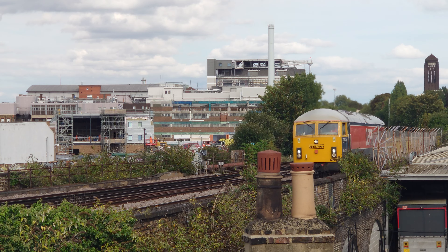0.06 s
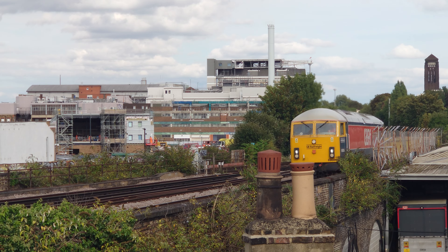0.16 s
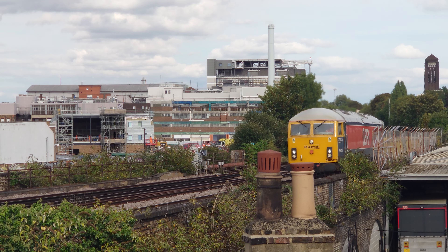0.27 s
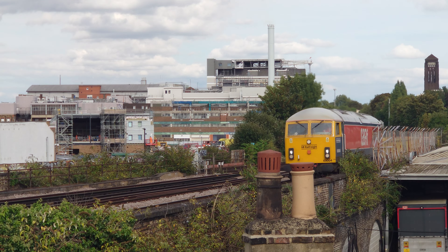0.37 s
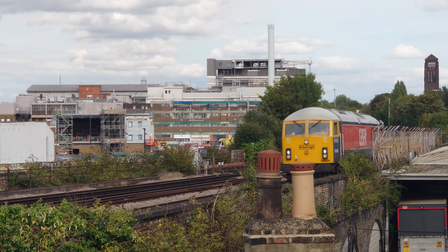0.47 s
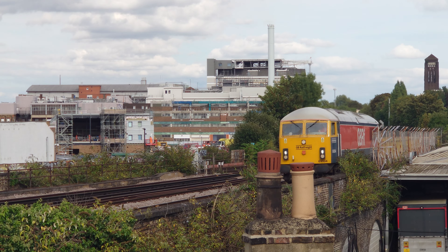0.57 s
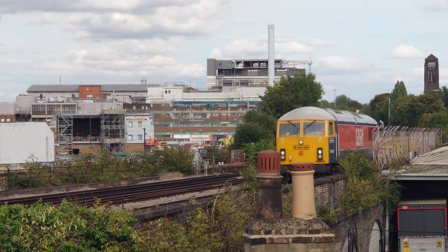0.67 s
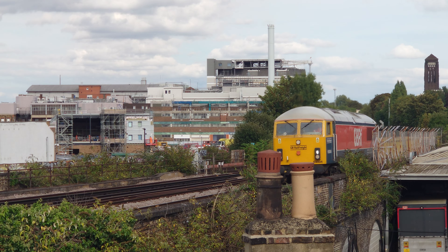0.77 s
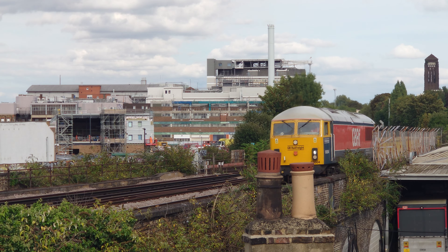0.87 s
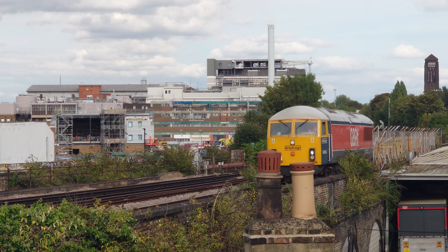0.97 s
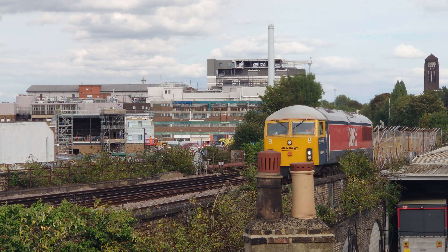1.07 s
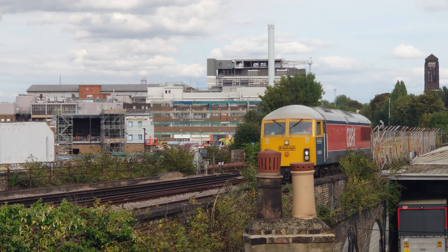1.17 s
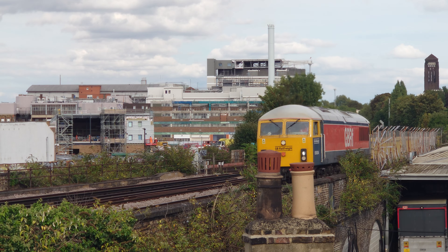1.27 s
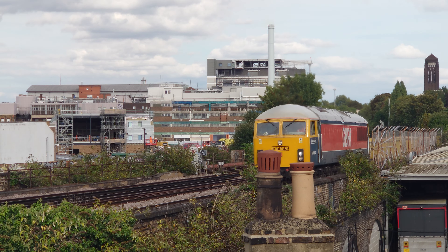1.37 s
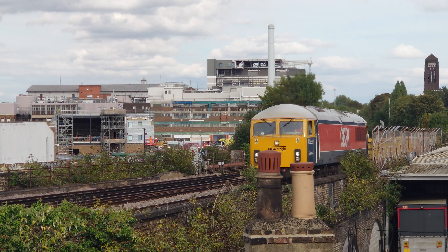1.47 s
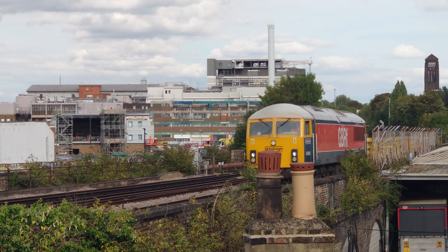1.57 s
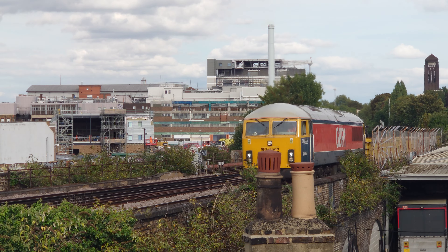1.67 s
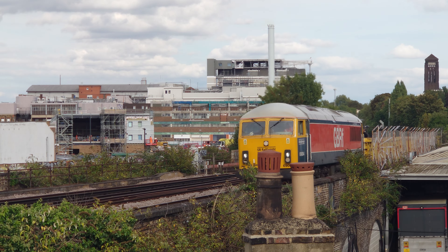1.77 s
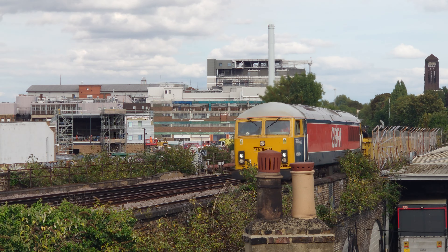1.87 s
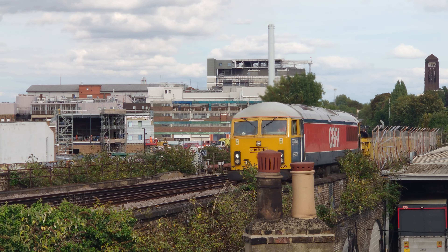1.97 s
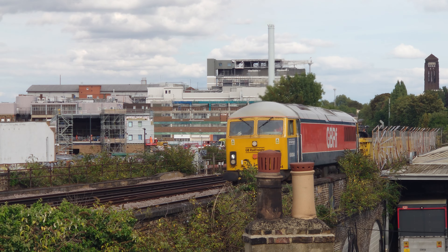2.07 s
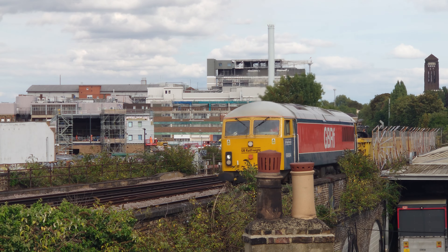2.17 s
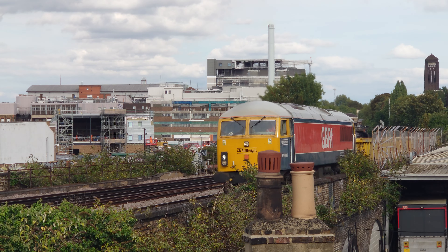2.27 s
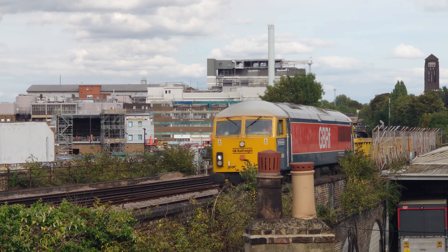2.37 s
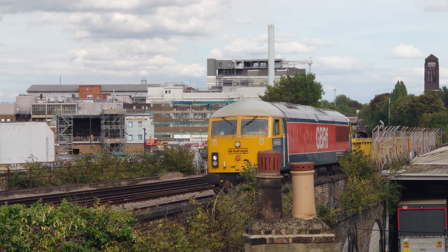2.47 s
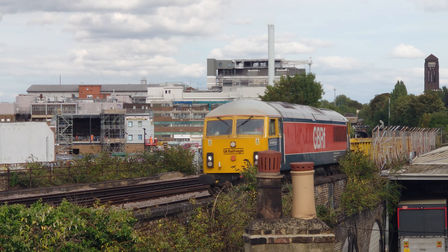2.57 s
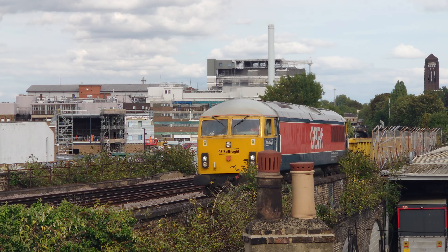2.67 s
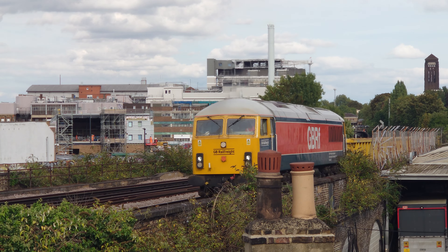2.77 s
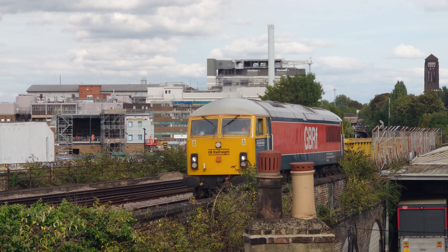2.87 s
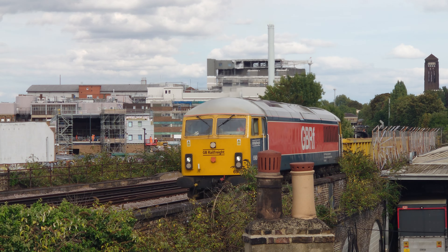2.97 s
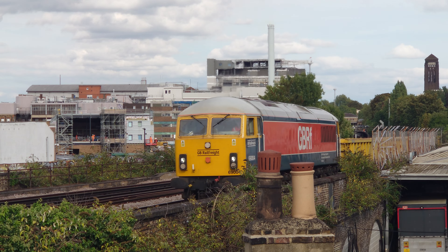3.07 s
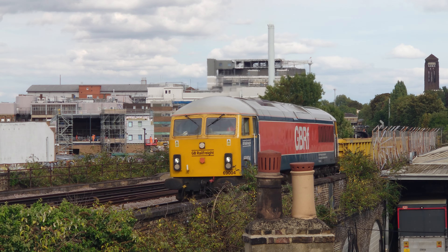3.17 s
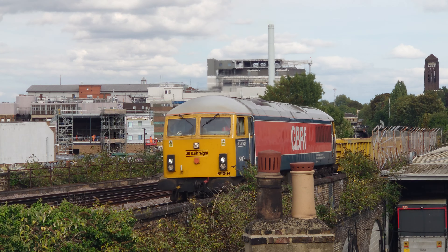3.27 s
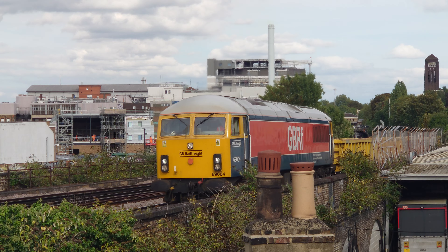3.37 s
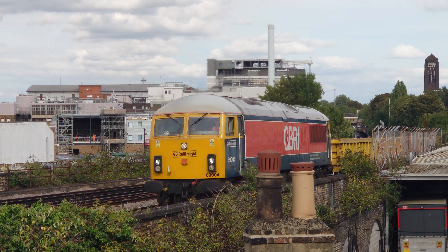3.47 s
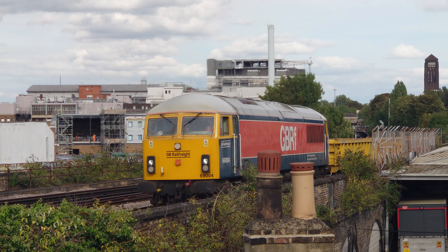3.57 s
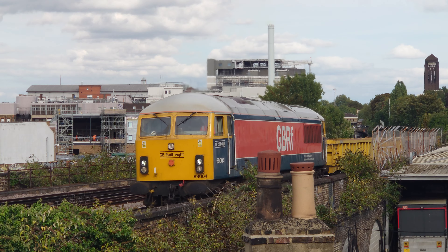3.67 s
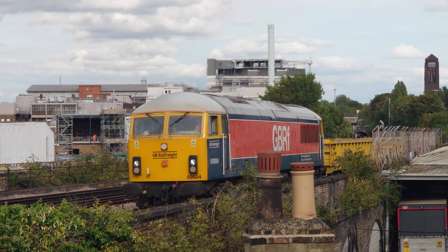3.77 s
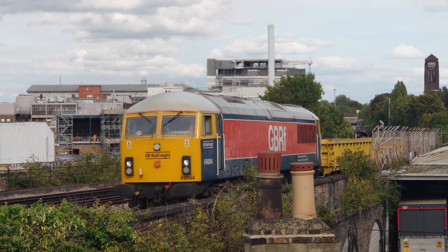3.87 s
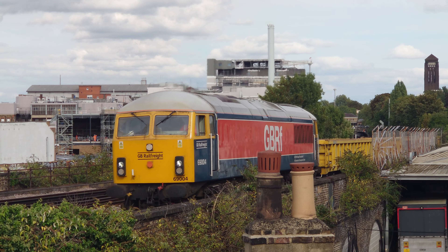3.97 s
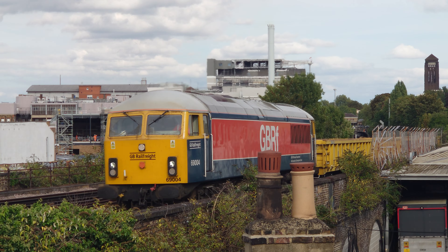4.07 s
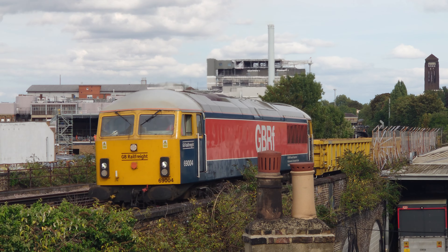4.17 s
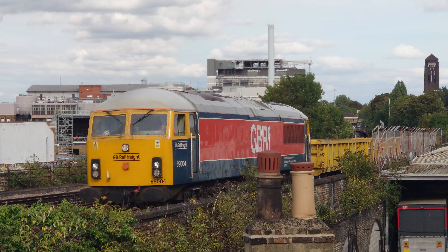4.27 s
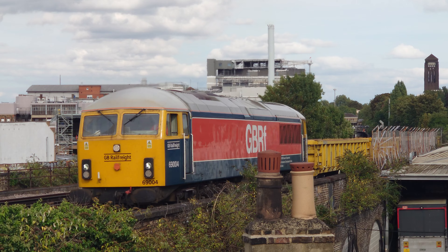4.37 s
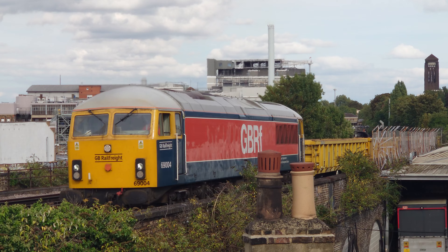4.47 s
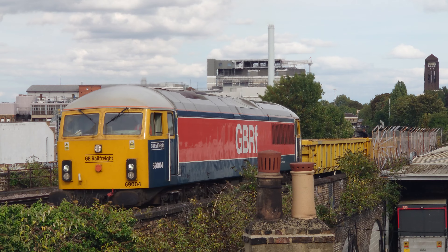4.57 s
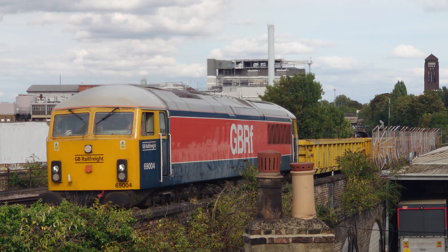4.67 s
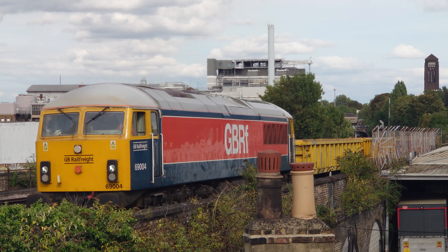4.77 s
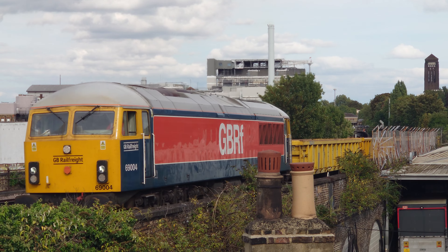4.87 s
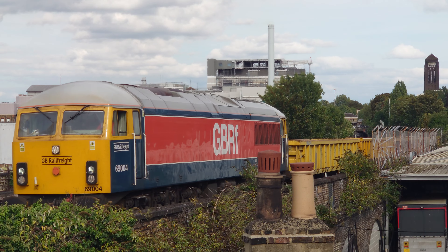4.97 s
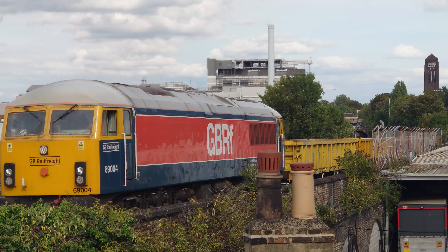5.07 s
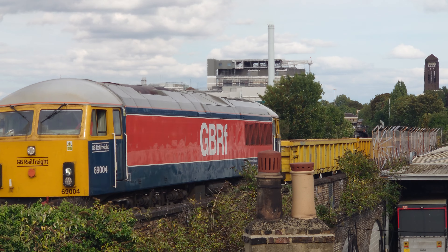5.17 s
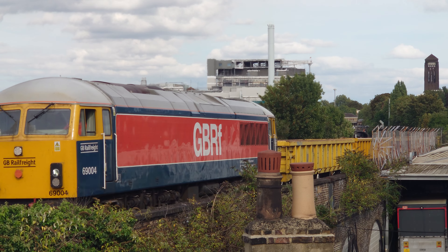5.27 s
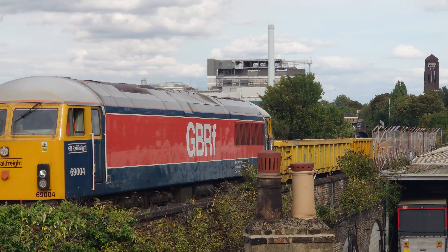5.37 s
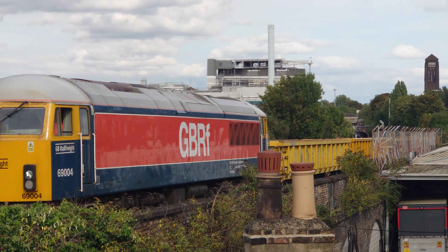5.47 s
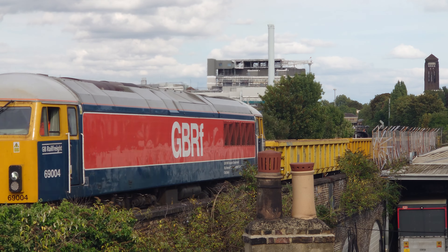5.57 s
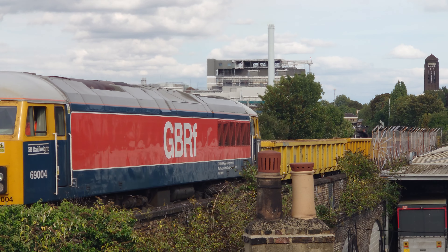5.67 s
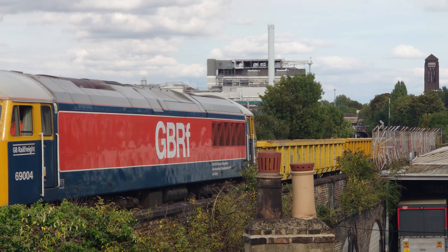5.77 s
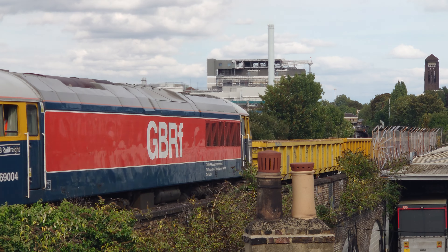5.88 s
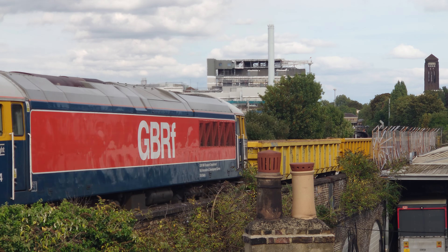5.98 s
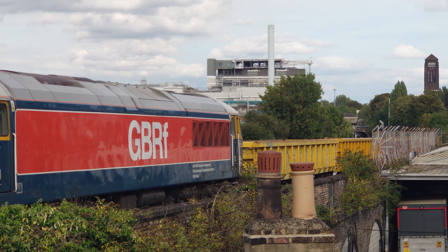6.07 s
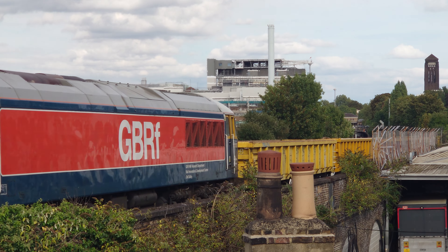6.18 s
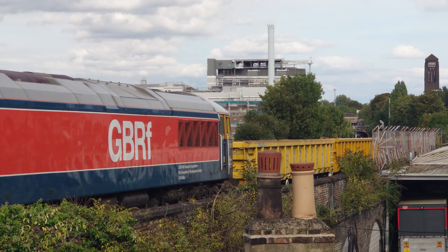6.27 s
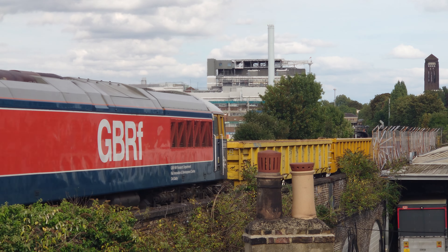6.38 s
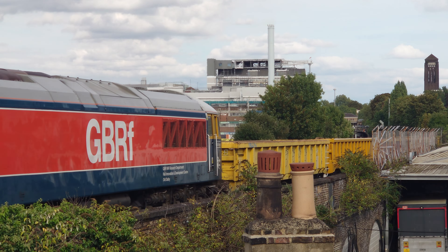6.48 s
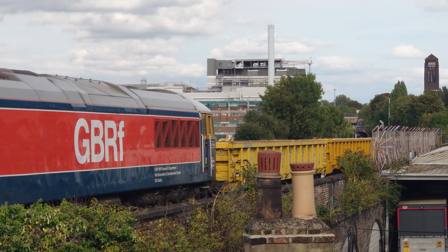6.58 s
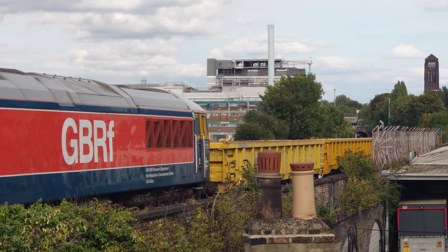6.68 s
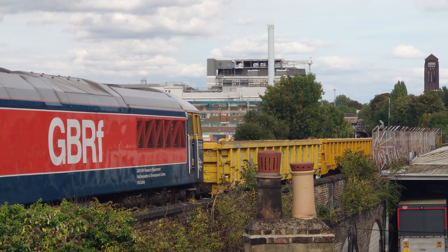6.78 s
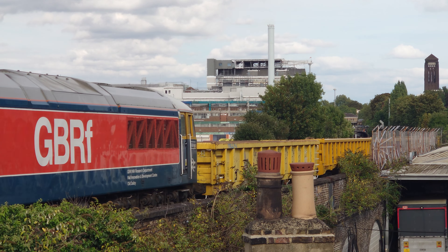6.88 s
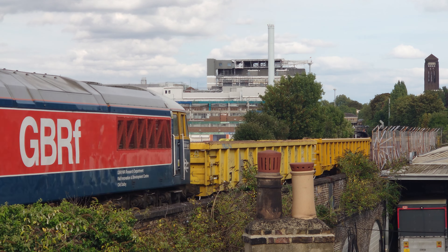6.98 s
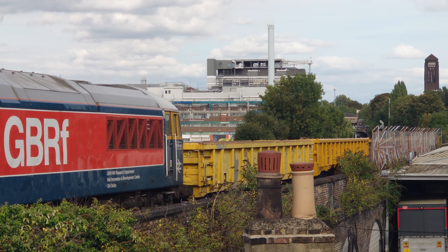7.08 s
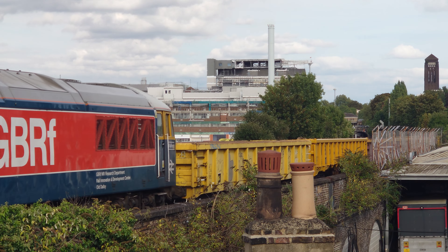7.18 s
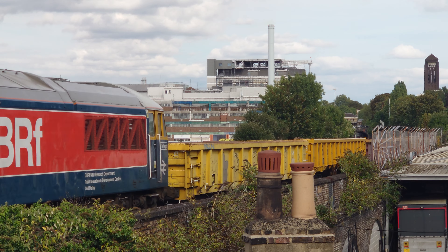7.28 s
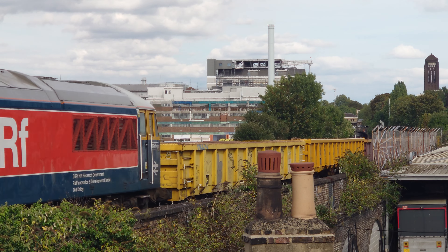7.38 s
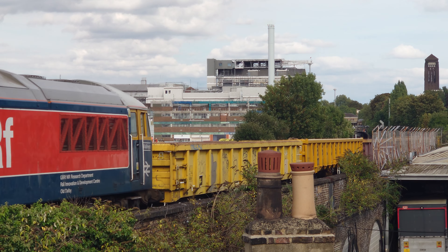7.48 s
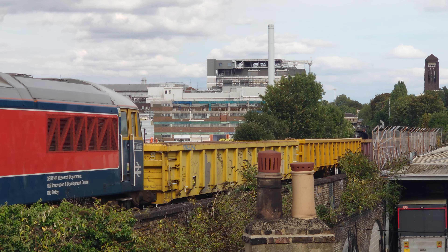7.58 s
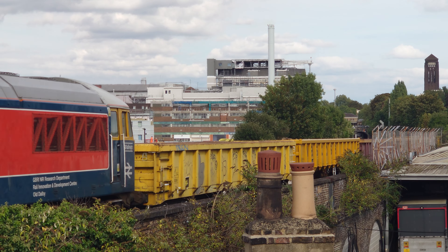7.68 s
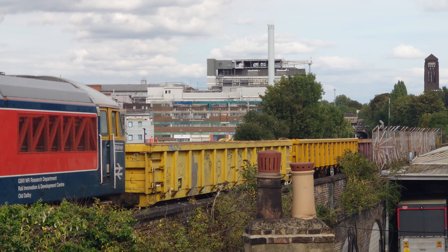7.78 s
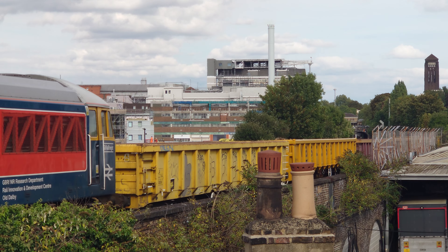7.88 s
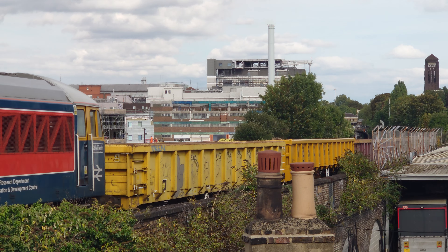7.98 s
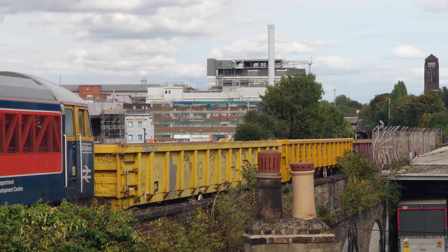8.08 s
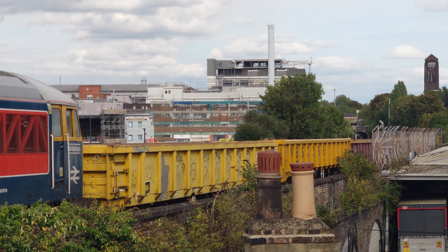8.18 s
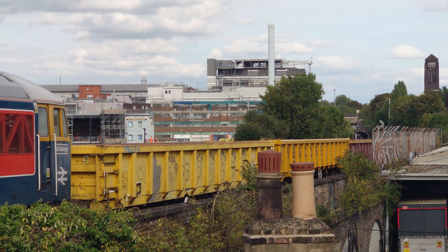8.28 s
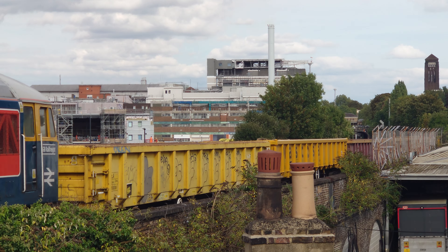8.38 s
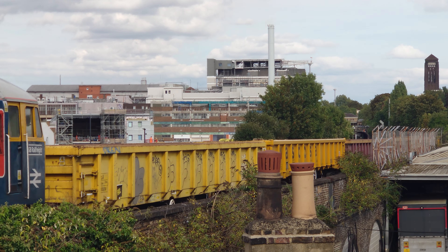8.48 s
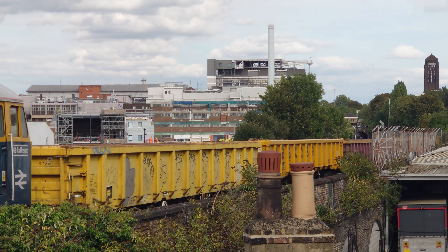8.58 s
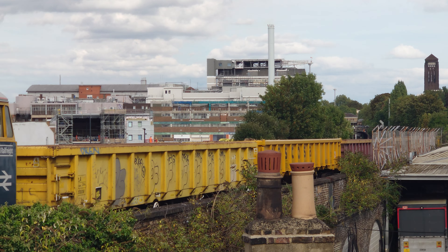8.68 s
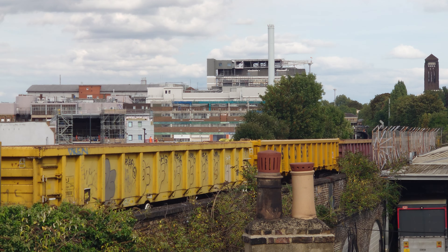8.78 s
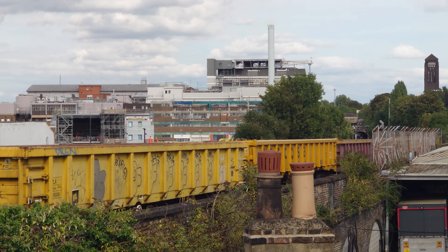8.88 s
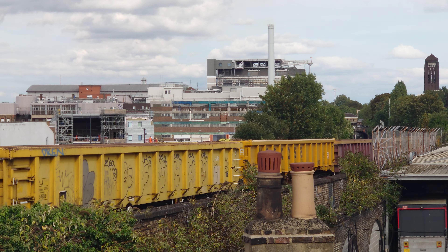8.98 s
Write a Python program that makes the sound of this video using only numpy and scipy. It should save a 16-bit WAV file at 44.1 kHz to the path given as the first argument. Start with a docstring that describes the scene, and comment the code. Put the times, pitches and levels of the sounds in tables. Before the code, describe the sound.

A diesel locomotive pulls a line of wagons along an outdoor embankment toward a fixed stereo microphone. Its pulsing exhaust drone and low rumble grow steadily louder, mixed with the hiss of fans and rolling wheels. Midway, an air valve gives one short puff. As the engine draws level, the roar gets fuller and brighter, a fluttering blower whine stands out, and a thin whistle cuts through at the end.

```python
"""A diesel locomotive pulls hard along an embankment and draws level, its wagons behind it.
The crankshaft sets a comb of exhaust and gear tones, and a blower whines over them. The roar of
engine and wheels swells, opens up and shifts between the two microphones as the engine room
comes near. An air valve spits once, and the blower's thin octave cuts through at the end."""
import sys
import numpy as np
from scipy import signal
from scipy.fft import rfft, irfft, next_fast_len
from scipy.io import wavfile
from scipy.ndimage import uniform_filter1d, minimum_filter1d, map_coordinates

SR = 44100
rng = np.random.default_rng(int(sys.argv[2]) if len(sys.argv) > 2 else 0)


def write(x):
    x = np.atleast_2d(x).T
    wavfile.write(sys.argv[1], SR, np.round(np.clip(x, -1, 1) * 32767).astype(np.int16))


N = 398223
TIME = np.arange(N) / SR


def amp(db):
    """Gain of a level in dB."""
    return 10 ** (np.asarray(db) / 20)


def along(points, hz):
    """Read a breakpoint curve on a log frequency axis."""
    f, values = np.transpose(points)
    return np.interp(np.log(hz + 1), np.log(f + 1), values)


def curves(rows):
    """One envelope for each column after the time."""
    times, *columns = np.transpose(rows)
    return [np.interp(TIME, times, column) for column in columns]


def wobble(rate):
    """Smooth random modulation, rate knots a second."""
    coarse = TIME[::64]
    knots = rng.standard_normal(round(N / SR * rate) + 4)
    return np.interp(TIME, coarse, map_coordinates(knots, [coarse * rate]))


def tone(cycles, level_db, drift):
    """A sine on a running count of cycles; its phase wanders by about drift radians."""
    angle = 2 * np.pi * ((cycles + rng.random()) % 1) + drift * wobble(6)
    return np.sqrt(2) * amp(level_db) * np.sin(angle)


# Exhaust note envelopes: t/s, level/dB
MAIN_NOTE = [(0.0, -37.5), (0.93, -24.5), (1.28, -32.5), (1.58, -23), (1.76, -24), (1.99, -38),
             (2.11, -25.5), (2.84, -24), (3.09, -25), (3.17, -48), (3.32, -20.5), (3.49, -18.5),
             (3.92, -27), (4.12, -19), (5.31, -21.5), (5.53, -14), (5.73, -24), (5.93, -18), (6.77, -15.5),
             (6.99, -24), (7.22, -14), (7.55, -18.5), (7.95, -13.5), (8.47, -25.5), (8.88, -14.5),
             (9.03, -14)]  # surges and drops out
UNDER_NOTE = [(0.0, -50), (1.16, -29), (1.26, -40), (1.68, -22.5), (2.46, -32.5), (2.51, -47),
              (2.81, -27.5), (4.3, -23), (4.45, -30.5), (5.83, -20.5), (6.09, -34.5), (6.92, -23),
              (7.14, -40), (7.27, -18.5), (8.07, -24), (9.03, -27)]  # swells more slowly
UPPER_NOTE = [(0, -40.5), (.55, -36), (1.1, -34), (1.35, -48.5), (1.9, -34), (3.4, -40.5), (4.3, -33.5),
              (5.6, -38), (7.0, -37.5), (7.3, -26), (7.5, -33), (7.75, -23), (7.95, -34), (8.3, -24),
              (9.03, -23.5)]  # hides in the rumble until the exhaust is close

def exhaust_notes(turns):
    """Firing repeats every turn, so the notes stand on whole multiples (orders) of the shaft speed."""
    return sum(tone(order * turns, curves(envelope)[0] + .8 * wobble(12), drift=2.5 / order)
               for order, envelope in ((9, MAIN_NOTE), (7, UNDER_NOTE), (15, UPPER_NOTE)))


# Deep exhaust tones: their shaft orders, then a row for each: far level/dB, near level/dB
BASS_ORDERS = (3, 5)
BASS_LEVELS = [(-39.5, -17.5), (-36, -25)]

def exhaust_bass(turns, near, fade_db=5):
    """The exhaust's low end builds on the approach and dips at random."""
    bass = np.zeros(N)
    for order, (far_db, near_db) in zip(BASS_ORDERS, BASS_LEVELS):
        level_db = far_db + near * (near_db - far_db) - fade_db * np.abs(wobble(3.2))
        bass += tone(order * turns, level_db, drift=1.8 / order)
    return bass


# The engine's weaker tones: their shaft orders, then a row for each, before trims and swell:
# far level/dB, near level/dB
COMB_ORDERS = (4, 6, 8, 10, 12, 14, 16, 17, 18, 24, 30, 34, 45, 47, 57, 59, 65, 72, 73, 77, 80, 90, 113)
COMB_LEVELS = [(-50, -41), (-41, -39), (-33.5, -33), (-40.5, -34.5), (-43, -55.5), (-46, -34),
               (-44.5, -47.5), (-41.5, -47.5), (-39, -45), (-54, -44.5), (-57.5, -42), (-63, -41),
               (-46.5, -51), (-43, -50), (-53.5, -42.5), (-46.5, -49.5), (-49.5, -44), (-55, -48.5),
               (-48, -38.5), (-49.5, -44), (-50, -48), (-54, -39), (-57.5, -45)]

def engine_comb(turns, near, swell_db, trim_db=1, near_trim_db=-7):
    """Firing and gearing lay down a bed of wavering harmonics that rides up with the roar."""
    comb = np.zeros(N)
    for order, (far_db, near_db) in zip(COMB_ORDERS, COMB_LEVELS):
        level_db = far_db + near * (near_db + near_trim_db - far_db) + swell_db + trim_db
        comb += tone(order * turns, level_db + 3 * wobble(4), drift=.95)
    return comb


BLOWER_ORDER = 117.15  # cycles per shaft turn
# Whine partials: offset/Hz, multiple of the blower pitch, gain/dB
WHINE_PARTIALS = [(0, 1, 3.5), (-16, 1, -10), (22, 1, -14)]
# Whine envelope: t/s, level/dB
WHINE_LEVEL = [(0, -53.5), (2.15, -55.5), (2.4, -48), (3.3, -53), (4.4, -40), (4.7, -49), (5.3, -44.5),
               (5.8, -49.5), (6.1, -44.5), (6.5, -39), (6.75, -47), (7.0, -29.5), (7.3, -35), (7.45, -45),
               (7.7, -31), (8.25, -40.5), (8.4, -37), (9.03, -41)]

def blower_whine(turns, flutter_db=1.2):
    """The blower tracks the shaft: one fluttering tone with a sideband on either side."""
    level_db, = curves(WHINE_LEVEL)
    whine = np.zeros(N)
    for offset_hz, multiple, gain_db in WHINE_PARTIALS:
        cycles = multiple * BLOWER_ORDER * turns + offset_hz * TIME
        whine += tone(cycles, level_db + gain_db + flutter_db * wobble(25), drift=.67)
    return whine


# Gear tone envelope: t/s, level/dB
GEAR_LEVEL = [(0, -49), (1.7, -49), (2.7, -43.5), (3.5, -43.5), (4.0, -34.5), (4.3, -44.5), (6.3, -47),
              (7.4, -41), (7.9, -29.5), (9.03, -41)]

def gear_mesh(turns, teeth=79, flutter_db=2.5):
    """Meshing gears sing at one cycle per tooth."""
    return tone(teeth * turns, curves(GEAR_LEVEL)[0] + flutter_db * wobble(24), drift=.7)


# Stereo width of the noise: f/Hz, left-right likeness (0-1)
LIKENESS = [(25, 0.67), (170, 0.98), (350, 0.75), (520, .72), (850, 0.86), (1300, 0.83), (2000, 0.17),
            (3500, 0.11), (5500, 0.21), (15000, .05)]
# Pan by frequency: f/Hz, left minus right/dB
PAN_FAR = [(60, 13.5), (500, -6), (1000, 8.5), (1500, -6.5), (2200, -6.5), (3200, -3.5), (4500, -9),
           (6000, -13.5), (7100, -24), (7900, 3.5), (9000, -4), (15000, -5)]
PAN_NEAR = [(60, -3), (500, 0), (1000, 5.5), (1600, 0), (2100, -7), (3200, 0.5), (4500, -3), (6500, -10),
            (7900, 4.5), (9500, 8), (12500, 11), (15000, -1.5)]
# Phase between the microphones: f/Hz, left lead/rad
LEAD_FAR = [(0, 0), (600, -.2), (1290, -2.4), (1980, -4.6), (3000, -5.6), (4390, -8.5), (6000, -12)]
LEAD_NEAR = [(0, .05), (500, .55), (1300, .7), (1900, 0), (2600, -2.4), (3500, 1), (6000, 6)]

def rush(spectrum, close, patchy_db, rings=()):
    """Coloured noise with random patches of gain, in the far or close stereo image; mid rms is 1."""
    pan, lead = (PAN_NEAR, LEAD_NEAR) if close else (PAN_FAR, LEAD_FAR)
    noise = signal.stft(rng.standard_normal((2, N), dtype=np.float32), nperseg=512)[2]
    patches = rng.standard_normal(noise.shape[1:], dtype=np.float32)
    patches = uniform_filter1d(uniform_filter1d(patches, size=6, axis=0), size=14, axis=1)
    patches /= np.sqrt(np.mean(patches ** 2))
    patchy = signal.istft(noise * amp(patchy_db * patches), nperseg=512)[1][:, :N]
    size = next_fast_len(N + SR // 2)
    hz = np.fft.rfftfreq(size, 1 / SR)
    mid, side = rfft(patchy, size)
    spread = np.arccos(np.clip(along(LIKENESS, hz), 0, 1)) / 2
    mid, side = mid * np.cos(spread), side * np.sin(spread)
    ring_db = sum(db / (1 + (2 * (hz - centre) / width) ** 2) for centre, width, db in rings)
    colour = amp(along(spectrum, hz) + ring_db)
    leftward = amp(along(pan, hz) / 2) * np.exp(.5j * along(lead, hz))
    stereo = irfft(colour * np.array([(mid + side) * leftward, (mid - side) / leftward]), size)[:, :N]
    return stereo / np.std(stereo.mean(axis=0))


def crossfade(far, close, near):
    """Equal-power fade from the distant colour to the close one."""
    return np.cos(near * np.pi / 2) * far + np.sin(near * np.pi / 2) * close


# EQ curves of the roar's layers: f/Hz, relative level/dB
BODY_FAR = [(130, -10), (220, -3), (239, -4.5), (259, -8), (395, -8.5), (491, -11.5), (578, -5),
            (836, -9.5), (992, -9), (1070, -16), (1250, -15.5), (1450, -9.5), (1530, -11.5), (1570, -31),
            (1900, -33.5), (2470, -46.5), (4180, -120)]
BODY_NEAR = [(130, -27.5), (220, 1.5), (425, -1.5), (469, -16), (583, -3), (644, -9), (711, -1), (829, -6),
             (983, -3.5), (1340, -17.5), (1480, -8.5), (1570, -22.5), (1900, -18.5), (2470, -47.5),
             (4180, -120)]
HISS_FAR = [(940, -33), (1600, 0), (1750, -2.5), (1970, -2), (2550, -5.5), (3380, -7.5), (4700, -13.5),
            (5060, -16), (6580, -28), (8000, -61.5), (10400, -76), (17600, -120)]
HISS_NEAR = [(940, -41), (1600, -1.5), (1920, -5), (2170, -6.5), (2800, -9.5), (3050, -9.5), (3570, -10),
             (5100, -15.5), (6720, -29.5), (8000, -45), (10400, -65), (17600, -120)]
RUMBLE = [(12, -52), (20, -23.5), (26, -11.5), (35, 1), (50, 9), (70, 8), (100, 1), (140, 0), (200, -4),
          (250, -11.5), (330, -61.5)]
TREBLE = [(4350, -37.5), (7400, -2), (8000, -11.5), (8800, -4.5), (10500, -7), (11500, -4), (12200, 0),
          (12800, -3.5), (13500, -15), (15600, -11)]
# Panels and ducts ringing in the hiss: f/Hz, width/Hz, far boost/dB, near boost/dB
PANELS = [(2005, 45, 7, 1), (2180, 40, 3, 0), (2345, 35, 4, 1), (2750, 60, 4, -3), (2965, 50, 6, 3),
          (3280, 45, 5, 3), (3450, 40, 3, 1), (3730, 35, 1.5, 4), (4130, 80, 3, -1), (4340, 60, 3, 2),
          (4480, 50, 4, 4), (6760, 60, 3, 4)]
# Fader moves as the train comes up: t/s, body level/dB, rumble level/dB, hiss level/dB
APPROACH = [(0, -36.5, -37.5, -47), (.9, -34, -34, -44), (1.8, -32.5, -32.5, -44.5), (2.6, -31, -32, -41.5),
            (3.3, -30, -26.5, -40.5), (4.2, -28.5, -29.5, -39), (5.1, -27.5, -25, -38),
            (5.7, -27.5, -26, -38.5), (6.4, -27.5, -23, -38.5), (7.1, -25.5, -21, -36),
            (7.5, -23.5, -22, -35.5), (8.1, -22, -22.5, -34.5), (8.8, -21.5, -21, -32),
            (9.03, -23, -21, -33)]

def roar(near, swell_db, surge_db=.96, flicker_db=.4):
    """Exhaust turbulence, fans and rolling wheels: rumble, body, ringing hiss and flickering treble."""
    body_db, rumble_db, hiss_db = curves(APPROACH)
    treble_db = -73.5 + 2.18 * swell_db  # the top opens faster than the body grows
    far_body = rush(BODY_FAR, close=False, patchy_db=.97)
    near_body = rush(BODY_NEAR, close=True, patchy_db=.7)
    far_hiss = rush(HISS_FAR, close=False, patchy_db=.67, rings=np.delete(PANELS, 3, axis=1))
    near_hiss = rush(HISS_NEAR, close=True, patchy_db=1, rings=np.delete(PANELS, 2, axis=1))
    rumble = rush(RUMBLE, close=True, patchy_db=0)
    treble = rush(TREBLE, close=True, patchy_db=1.2)
    treble *= amp(np.outer([-2, 7], 1 - near))  # from afar it sits nearer the centre
    return (amp(rumble_db + surge_db * wobble(5)) * rumble
            + amp(body_db) * crossfade(far_body, near_body, near)
            + amp(hiss_db) * crossfade(far_hiss, near_hiss, near)
            + amp(treble_db + flicker_db * wobble(12)) * treble)


# EQ curve of the escaping air: f/Hz, relative level/dB
VALVE_COLOUR = [(1500, -40), (2500, -12), (3000, -2), (3600, 0), (4100, -10), (5500, -20), (8000, -50),
                (16000, -70)]

def air_valve(start_s=4.99, level_db=-42, attack_s=.041, hold_s=.22, release_s=.07):
    """An air valve spits one short, bright puff."""
    gate = np.interp(TIME - start_s, np.cumsum([0, attack_s, hold_s, release_s]), [0, 1, 1, 0])
    return amp(level_db) * gate ** 2 * rush(VALVE_COLOUR, close=False, patchy_db=1.5)


# Whistle envelope: t/s, level/dB
WHISTLE_LEVEL = [(0, -68.5), (3, -61), (3.6, -64), (8.2, -63), (8.5, -46), (8.7, -52), (9.03, -40.5)]

def blower_whistle(turns, flutter_db=2.5):
    """The blower's thin, unsteady octave, heard right of centre once its side comes into view."""
    level_db = curves(WHISTLE_LEVEL)[0] + flutter_db * wobble(20)
    return tone(2 * BLOWER_ORDER * turns, level_db, drift=2.2) * amp([[-1.5], [1.5]])


# The engine's bearing: t/s, left lag/ms
BEARING = [(0, .11), (4, .09), (5.5, .02), (7, -.04), (8, -.1), (9.03, -.17)]

def pan_engine(engine, pan_db=-2):
    """Sound from one side reaches one microphone first; the level leans right throughout."""
    half_lag_s = curves(BEARING)[0] / 2000
    time, wave = np.pad([TIME, engine], ((0, 0), (16, 16)), "reflect", reflect_type="odd")
    left = np.interp(TIME - half_lag_s, time, wave) * amp(pan_db / 2)
    right = np.interp(TIME + half_lag_s, time, wave) * amp(-pan_db / 2)
    return np.array([left, right])


# Crankshaft speed as heard, sinking as the approach turns into a pass: t/s, f/Hz
SHAFT_SPEED = [(0, 12.72), (3, 12.724), (6, 12.716), (7.5, 12.684), (9.03, 12.644)]
# Far-to-close blend: t/s, nearness (0-1)
NEARNESS = [(0, 0), (4, 0.07), (5.5, 0.34), (6.5, 0.5), (7.3, 0.69), (9.03, 1)]

def scene():
    """The mix: one crankshaft drives every tone while the train closes in."""
    near = np.clip(curves(NEARNESS)[0], 0, 1)
    turns = np.cumsum(curves(SHAFT_SPEED)[0]) / SR
    swell_db = curves(APPROACH)[0] + 30  # the roar's body relative to mid-approach
    engine = (exhaust_notes(turns) + exhaust_bass(turns, near) + engine_comb(turns, near, swell_db)
              + blower_whine(turns) + gear_mesh(turns))
    return pan_engine(engine) + blower_whistle(turns) + roar(near, swell_db) + air_valve()


def record(dry, ceiling=.825, top_hz=15720):
    """A limiter eases the highest peaks down, then a brick-wall low-pass trims the top."""
    needed = np.minimum(1, ceiling / (np.abs(dry).max(axis=0) + 1e-9))
    gain = uniform_filter1d(minimum_filter1d(needed, size=881), size=441)
    size, margin = next_fast_len(N + SR // 2), SR // 10
    # mirrored ends keep the filter from clicking
    padded = np.pad(dry * gain, ((0, 0), (margin, size - N - margin)), "reflect", reflect_type="odd")
    passband = np.fft.rfftfreq(size, 1 / SR) < top_hz
    return irfft(rfft(padded) * passband, size)[:, margin:margin + N]


dry = scene()
out = record(dry)
write(out)
```